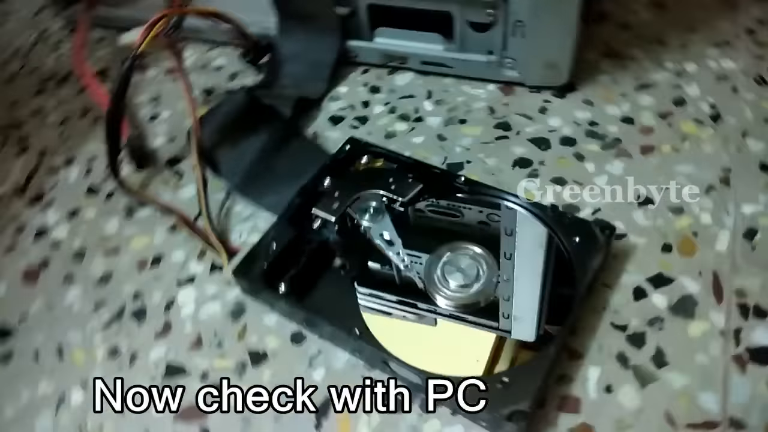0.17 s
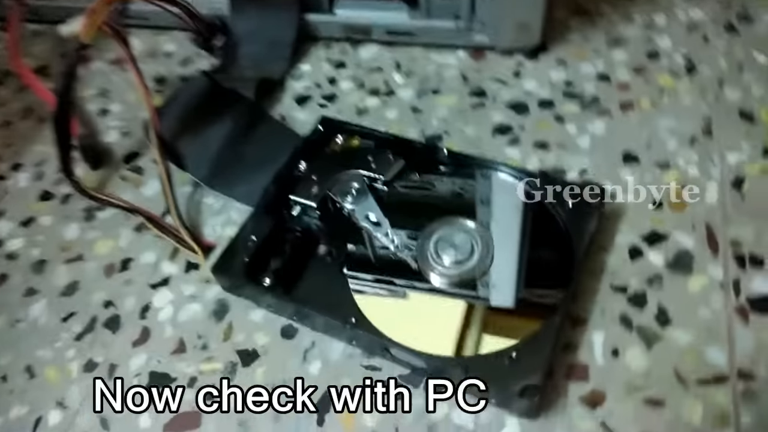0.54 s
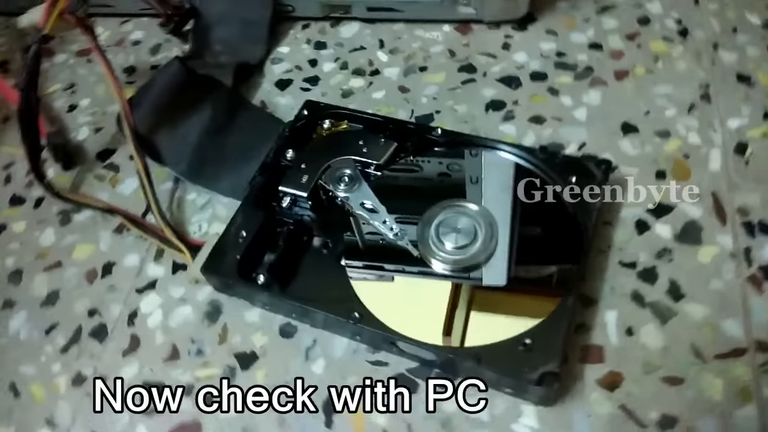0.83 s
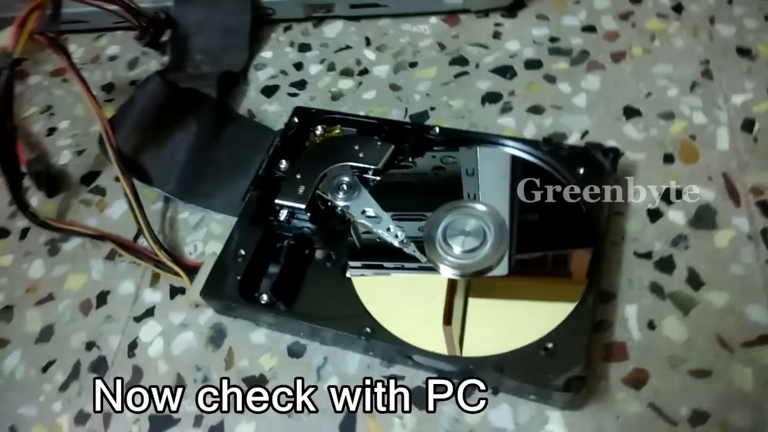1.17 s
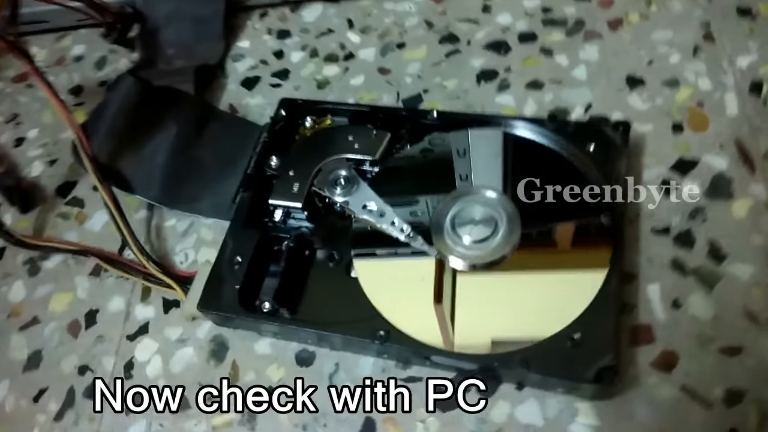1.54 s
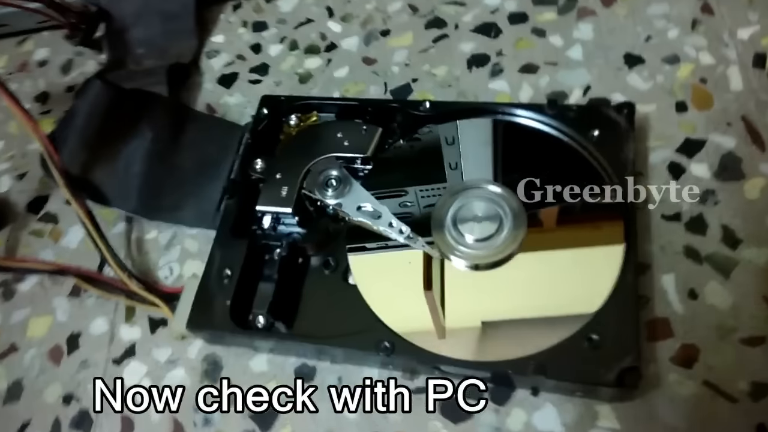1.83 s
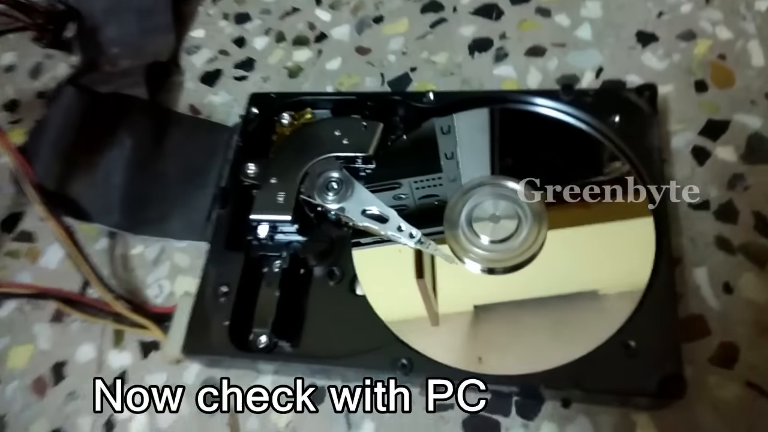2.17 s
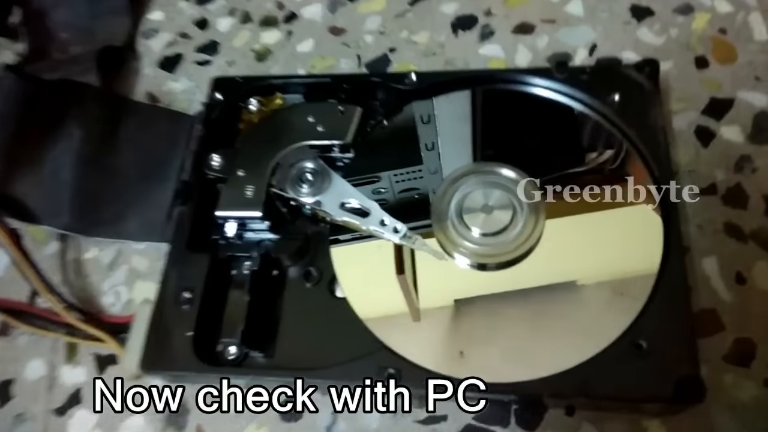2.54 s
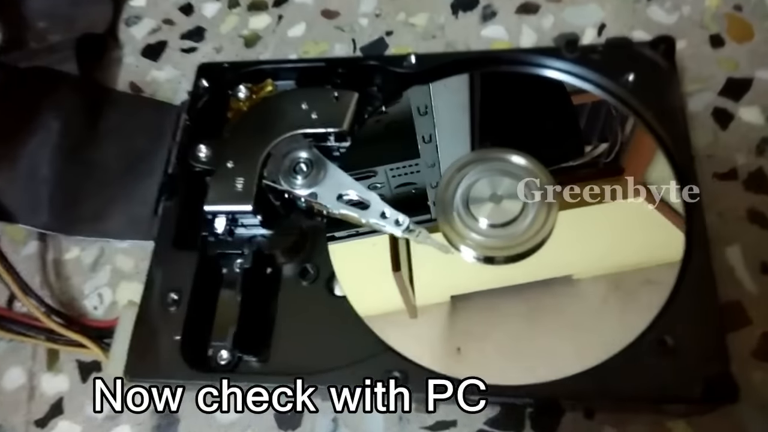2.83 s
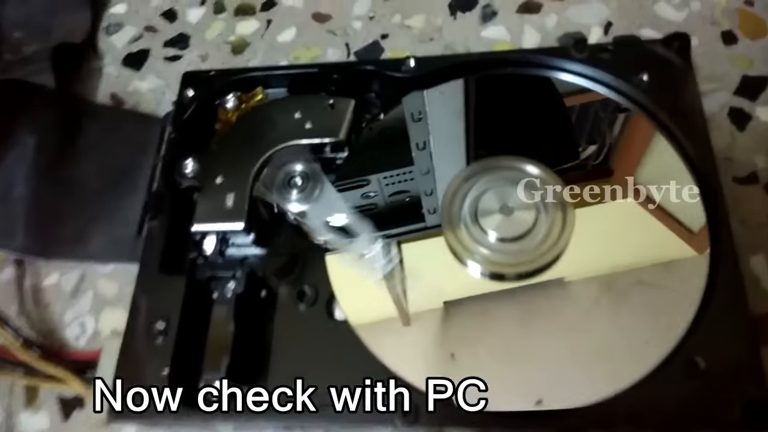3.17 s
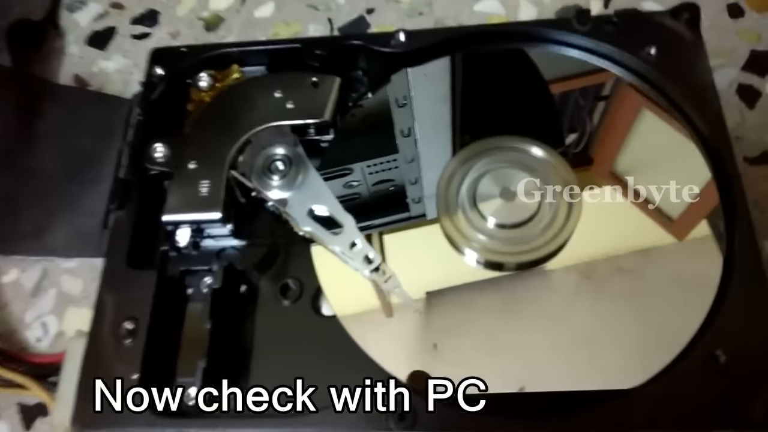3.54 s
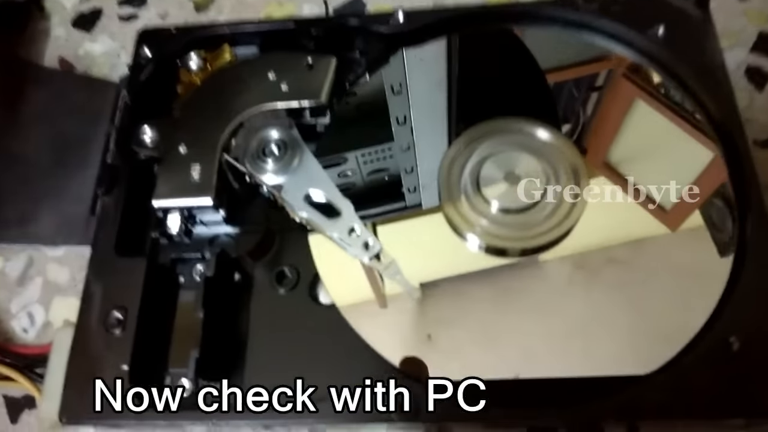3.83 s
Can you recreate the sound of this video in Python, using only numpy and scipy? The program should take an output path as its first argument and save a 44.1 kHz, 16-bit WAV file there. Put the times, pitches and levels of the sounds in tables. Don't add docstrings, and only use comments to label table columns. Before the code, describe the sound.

Over a quiet computer fan and slight grille rattle, a hard drive buzzes briefly, spins up into bright airy hiss, and its arm slams twice. The handheld phone moves closer, picking up low thumps and draught buffeting.

```python
import sys
import numpy as np
from scipy import signal
from scipy.fft import rfft, irfft, next_fast_len
from scipy.io import wavfile
from scipy.ndimage import uniform_filter1d, map_coordinates

SR = 44100
rng = np.random.default_rng(int(sys.argv[2]) if len(sys.argv) > 2 else 0)


def put_to_file(sound):
    columns = np.atleast_2d(sound).T
    safe = np.clip(columns, -1, 1)
    whole_steps = np.round(safe * 32767)
    wavfile.write(sys.argv[1], SR, whole_steps.astype(np.int16))


def invert_db(level):
    return 10 ** (np.asarray(level, dtype=float) / 20)


N = 176400
TIME = np.arange(N) / SR
# pitch_hz, likeness [-1 to 1]
LIKENESS = [(60, 1), (380, 0.86), (2380, -0.29), (15000, -0.26)]


def unit(x):
    return x / np.sqrt(np.mean(x ** 2) + 1e-20)


def along(points, hz):
    f, v = np.transpose(points)
    return np.interp(np.log(hz + 1), np.log(f + 1), v)


def curves(rows, t=TIME):
    s, *columns = np.transpose(rows)
    return [np.interp(t, s, column) for column in columns]


def wobble(rate):
    knots = rng.standard_normal(int(N * rate / SR) + 4)
    return map_coordinates(knots, [TIME * rate])


def filtered(x, response):
    size = next_fast_len(x.shape[-1] + 8192)
    spectrum = rfft(x, size) * response(np.fft.rfftfreq(size, 1 / SR))
    return irfft(spectrum, size)[..., :x.shape[-1]]


def pair(left, right):
    return lambda hz: invert_db([along(left, hz), along(right, hz)])


def resonant(table):
    def response(f):
        total = 0
        for k, (center, width, left, right) in enumerate(table):
            ring = 1j * f * width / (center * center - f * f + 1j * f * width)
            total = total + (-1) ** k * invert_db([[left], [right]]) * ring
        return total
    return response


def steep_resonant(table):
    response = resonant(table)
    return lambda f: response(f) * np.abs(response(f))


def noise(patchy_db, alike, shape=lambda hz, t: 1):
    hz, t, z = signal.stft(rng.standard_normal((2, N)), SR, nperseg=512)
    patches = uniform_filter1d(rng.standard_normal(z.shape[1:]), 5, 0)
    patches = uniform_filter1d(patches, 10, 1)
    angle = np.arccos(np.clip(along(alike, hz), -1, 1))[:, None] / 2
    mid, side = z[0] * np.cos(angle), z[1] * np.sin(angle)
    z = np.array([mid + side, mid - side])
    z = z * invert_db(patchy_db * unit(patches)) * shape(hz[:, None], t)
    return signal.istft(z, SR, nperseg=512)[1][:, :N]


def fan_rush():
    # pitch_hz, level_db [dB per Hz]
    left_color = [(80, -10), (400, -4.5), (800, -13), (2200, -11), (4200, -22), (8500, -26.5),
                  (12600, -15.5), (15500, -31.5)]
    right_color = [(80, -6), (400, -8), (900, -11.5), (2200, -18), (4200, -23.5), (8000, -26),
                   (11000, -22.5), (15500, -33)]
    # pitch_hz, width_hz, left_db, right_db
    case = [(162.4, 25.6, -1.5, -2.5), (319, 81, -1.5, -3), (566, 59, -4, -8), (1880, 66, -8, -28)]
    dip_db, dip_hz = -10, 940

    def dip(hz, t):
        lowered = np.clip(t - 1.8, 0, 1)
        return invert_db(dip_db * lowered * np.exp(-(np.log((hz + 1) / dip_hz) / 0.12) ** 2))

    rush = unit(filtered(noise(1.1, LIKENESS, dip), pair(left_color, right_color)))
    hum = unit(filtered(noise(2.93, LIKENESS), steep_resonant(case)))
    return invert_db(-59.5 + 0.89 * wobble(5.3)) * rush + invert_db(-62) * hum


def fan_grille():
    # time_s, level_db
    strength = [
        (0, -69.5),
        (.38, -63.5),
        (.46, -57.5),
        (.55, -65),
        (1.55, -65.5),
        (1.9, -74.5),
    ]
    # pitch_hz, width_hz, left_db, right_db
    metal = [(793, 52, -3, -6), (898, 97, -18.5, -2), (1305, 140, -6.5, -8), (1760, 140, -7, -36)]
    ring = filtered(noise(3.7, LIKENESS), steep_resonant(metal))
    rattle = ring * invert_db(3.6 * wobble(17))
    return invert_db(curves(strength)[0]) * unit(rattle)


def clock():
    # start_s, level_db
    ticks = [
        (.472, -50.5),
        (1.47, -52.5),
    ]
    # pitch_hz, width_hz, left_db, right_db
    case = [(6840, 230, -14, 2), (11000, 820, -4, 7)]
    fade_s = 0.21
    puff = 0
    for s, db in ticks:
        puff = puff + invert_db(db - 60 * np.abs(TIME - s) / fade_s) * (TIME > s)
    return filtered(puff * rng.standard_normal((2, N)), resonant(case))


def fingers():
    # middle_s, length_s, level_db
    rubs = [
        (3.6, 0.13, -56.5),
        (0.226, 0.024, -62),
    ]
    # pitch_hz, level_db [dB per Hz]
    color = [(100, -22), (220, -7), (620, -22), (1000, -70)]
    touch = sum(invert_db(db) * np.exp(-((TIME - s) / length) ** 2) for s, length, db in rubs)
    return touch * unit(filtered(noise(1.2, [(100, 0.99)]), pair(color, color)))


def hand_and_draught():
    # time_s, level_db
    grip = [(0.0, -73), (0.07, -60), (0.6, -62), (0.65, -48), (0.79, -68), (0.84, -58.5), (1.6, -77.5),
            (1.69, -48.5), (1.86, -58), (1.92, -86), (2.13, -82), (2.2, -55), (2.47, -55.5), (2.7, -65)]
    # time_s, level_db, left_minus_right_db
    draught = [
        (2.65, -58.5, -4),
        (2.92, -55, 15),
        (3.25, -49.5, 7.5),
        (3.4, -41.5, -8.5),
        (3.53, -45.5, -8),
        (3.59, -45, 19),
        (3.82, -62.5, 2.5),
    ]
    # pitch_hz, level_db [dB per Hz]
    thump_color = [(28, -56), (47, 0), (60, 8.5), (90, -9.5), (140, -29), (330, -87)]
    gust_color = [(25, -37), (48, 1.5), (70, 0), (150, -10.5), (600, -71)]
    thump = filtered(noise(1.5, [(60, 0.84)]), pair(thump_color, thump_color))
    thump = unit(invert_db(4.6 * wobble(13.51)) * thump)
    gust = filtered(noise(1.4, [(60, 0.14)]), pair(gust_color, gust_color))
    gust = unit(invert_db(2.6 * np.array([wobble(16), wobble(16)])) * gust)
    level_db, pan_db = curves(draught)
    port_db = level_db + 2.0 + np.array([pan_db, -pan_db]) / 2
    late = np.clip((TIME - draught[0][0]) * 20, 0, 1)
    return (1 - late) * invert_db(curves(grip)[0]) * thump + late * invert_db(port_db) * gust


def motor_start():
    # pitch_hz, width_hz, left_db, right_db
    coils = [(9000, 1000, -13, -12), (11500, 860, -3.5, -10.5), (12870, 90, 14, -5), (15750, 40, 11, -2)]
    start_s, end_s, first_rate_hz, last_rate_hz = 0.202, 0.342, 70, 150
    on = (TIME > start_s) & (TIME < end_s)
    rate = np.interp(TIME, [start_s, end_s], [first_rate_hz, last_rate_hz])
    pulses = np.cumsum(on * rate) / SR
    first_louder = invert_db(2.2 * (pulses < 1))
    rasp = on * np.exp(-6.5 * (pulses % 1)) * first_louder * rng.standard_normal(N)
    return invert_db(-36.5) * filtered(rasp, resonant(coils))


def platter():
    # time_s, level_db, highest_hz
    spin = [
        (1.7, -76, 5030),
        (1.95, -65.5, 7500),
        (2.25, -60.5, 8050),
        (2.42, -52, 8900),
        (2.52, -49, 11300),
        (2.68, -46.5, 11300),
        (2.8, -44.5, 16400),
        (3.65, -43, 17800),
        (3.73, -47, 18000),
        (3.79, -61.5, 18000),
    ]
    # pitch_hz, level_db [dB per Hz]
    left_color = [(1500, -20.5), (4600, -21), (5200, -4.5), (7600, -8.5), (8100, -14), (11500, -20),
                  (12500, 1), (15500, -9.5)]
    right_color = [(1000, -23), (2400, -24), (3300, -5.5), (4600, -13.5), (5200, -5.5), (7300, 0.5),
                   (12500, -9), (15500, -21)]
    # time_s, level_db
    rumble = [
        (1.6, -100),
        (2.1, -62),
        (3.7, -53.5),
        (4.0, -55),
    ]
    # pitch_hz, level_db [dB per Hz]
    casting = [(700, -23), (1500, -0.5), (2400, -3.5), (3600, 0), (5000, -11), (8000, -15)]

    def top_edge(hz, t):
        return 1 / np.sqrt(1 + (hz / curves(spin, t)[1]) ** 18)

    air = unit(filtered(noise(1.25, [(1000, 0.16)], top_edge), pair(left_color, right_color)))
    body = unit(filtered(noise(6.0, [(1000, 0.29)]), pair(casting, casting)))
    return invert_db(curves(spin)[0] + 0.2 * wobble(15)) * air + invert_db(curves(rumble)[0]) * body


def arm_swish():
    # time_s, level_db
    swing = [
        (3.11, -71),
        (3.14, -44.5),
        (3.44, -43.5),
        (3.48, -94),
    ]
    # pitch_hz, width_hz, left_db, right_db
    color = [(9300, 10000, 0, -2.5)]
    swish = filtered(noise(1.5, [(1000, 0.092)]), lambda f: np.abs(resonant(color)(f)) ** 2)
    return invert_db(curves(swing)[0]) * unit(swish)


def arm_slams():
    # start_s, base_db, arm_db, stop_db
    contacts = [
        (3.1216, -20, -44, -18.5),
        (3.1232, -15, -19, -14),
        (3.1264, -14.5, -12, -15.5),
        (3.1322, -19, -11, -14.5),
        (3.138, -35, -14, -19),
        (3.147, -35, -24, -36),
        (3.3302, -39, -49, -29.5),
        (3.333, -44, -28, -18.5),
        (3.338, -26.5, -14.5, -18),
        (3.342, -28, -31.5, -22.5),
    ]
    # pitch_hz, level_db, fade_s [to -60 dB], left_minus_right_db
    base_tones = [(1416, 0, .085, -8), (1465, -9, .04, -6), (1833, -13, .045, 0), (1945, -11, .045, 4)]
    arm_tones = [(2623, -12, .045, -4), (3240, -8, .035, -6), (3385, 0, .045, -6), (3567, -9, .035, -3)]
    stop_tones = [(5123, -2.5, 0.021, -6), (5314, -2, 0.016, -1), (5310, -3.5, 0.016, 7),
                  (6666, -14, 0.029, -13.5), (8940, -12.5, 0.054, 2), (10080, -12, .03, 0)]
    # pitch_hz, level_db [dB per Hz]
    crack_color = [(1500, -7.5), (4000, 5), (8000, 2), (11000, -7), (13000, 7.5), (16000, 1)]
    # pitch_hz, level_db
    right_shade = [(9000, -2.5), (13000, -15.5)]
    crack_db, crack_fade_s, scrape_s = 0.5, 0.025, 0.0009

    def crack_response(f):
        return pair(crack_color, crack_color)(f) * pair([(1, 0)], right_shade)(f)

    out, t = np.zeros((2, N)), TIME[:SR // 4]
    for s, *levels in contacts:
        crack = unit(filtered(rng.standard_normal((2, len(t))), crack_response))
        ring = invert_db(levels[2] + crack_db - 60 * t / crack_fade_s) * crack
        for tones, part_db in zip((base_tones, arm_tones, stop_tones), levels):
            for hz, db, fade_s, pan in tones:
                side_db = np.array([[pan / 2], [-pan / 2]]) + 1.6 * rng.standard_normal((2, 1))
                phase = 1.4 * rng.standard_normal((2, 1))
                fading = invert_db(db + part_db + side_db - 60 * t / fade_s)
                ring = ring + fading * np.sin(2 * np.pi * hz * t + phase)
        out[:, round(s * SR):][:, :len(t)] += ring * (1 - np.exp(-t / scrape_s))
    stiff = signal.butter(3, 1190, "high", fs=SR, output="sos")
    return signal.sosfilt(stiff, out)


def room(x):
    # pitch_hz, fade_s [to -60 dB]
    fading = [(300, 0.23), (10000, 0.24)]
    hz, t, z = signal.stft(rng.standard_normal((2, SR // 2)), SR, nperseg=256)
    tail = signal.istft(z * invert_db(-60 * t / along(fading, hz)[:, None]), SR, nperseg=256)[1]
    delayed = np.pad(x, ((0, 0), (250, 0)))
    return signal.fftconvolve(delayed, tail / np.linalg.norm(tail[0]), axes=1)[:, :N]


def scene():
    background = fan_rush() + fan_grille() + clock()
    holding = fingers() + hand_and_draught()
    slams = arm_slams()
    drive = motor_start() + platter() + arm_swish() + slams + invert_db(-17) * room(slams)
    return background + holding + drive


def roll_off(x):
    return signal.sosfilt(signal.butter(12, 15750, fs=SR, output="sos"), x)


def record(dry):
    return roll_off(dry)


dry = scene()
out = record(dry)
put_to_file(out)
```